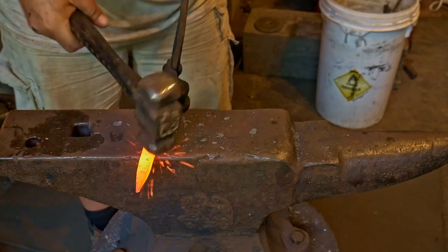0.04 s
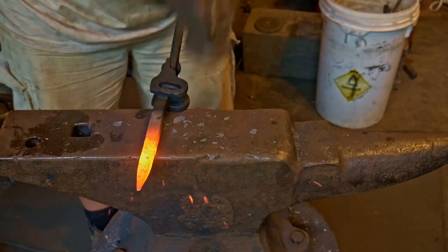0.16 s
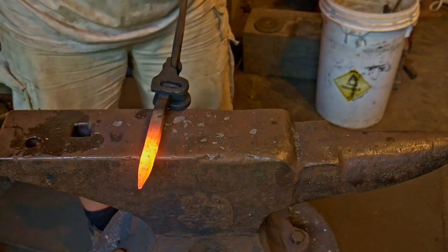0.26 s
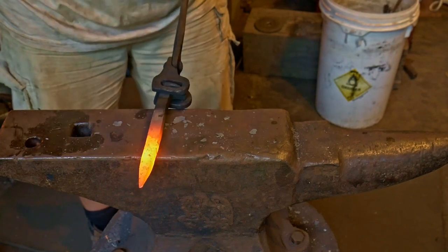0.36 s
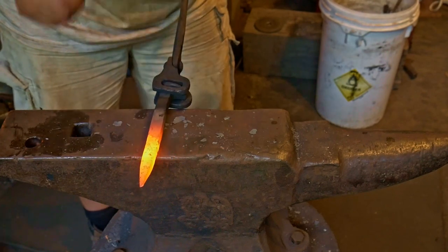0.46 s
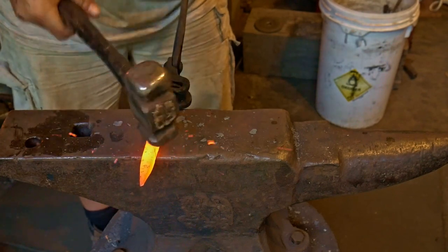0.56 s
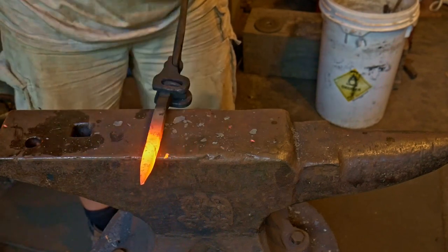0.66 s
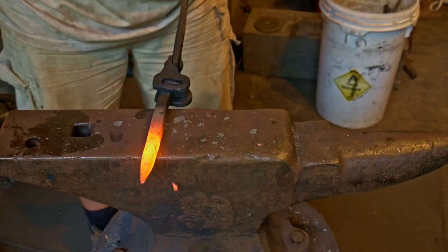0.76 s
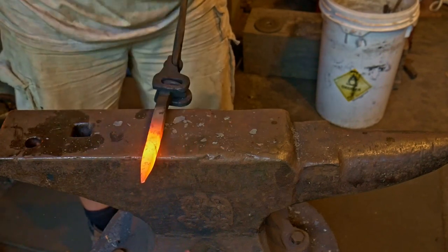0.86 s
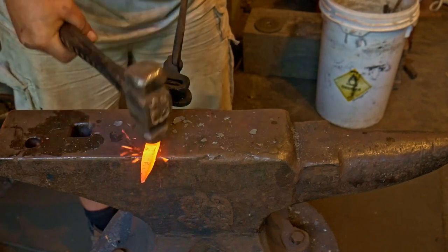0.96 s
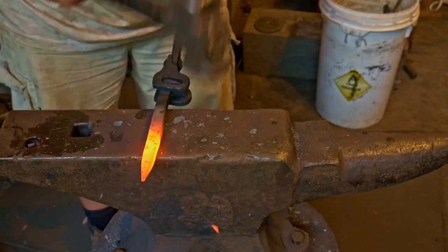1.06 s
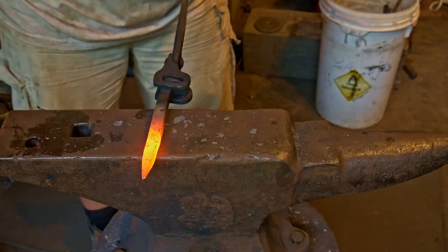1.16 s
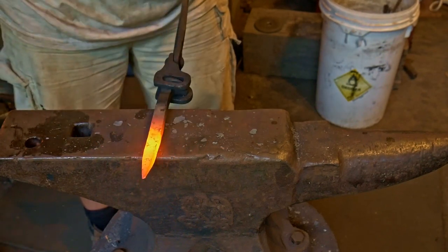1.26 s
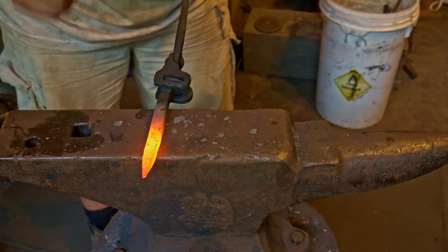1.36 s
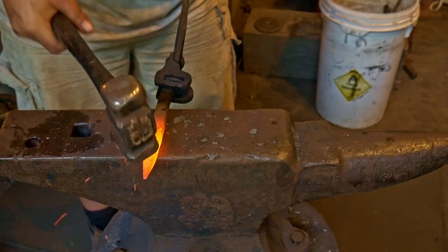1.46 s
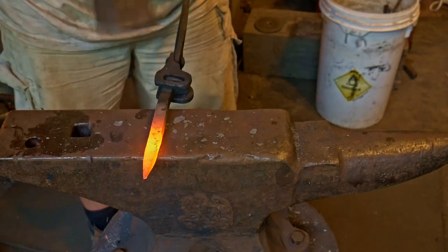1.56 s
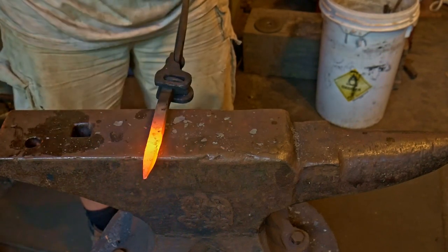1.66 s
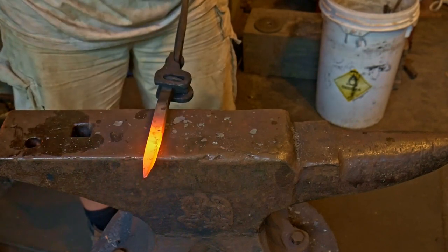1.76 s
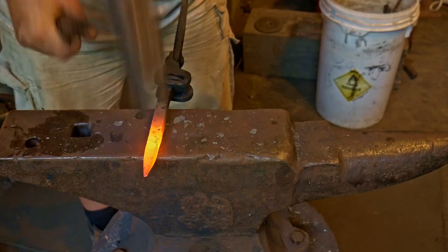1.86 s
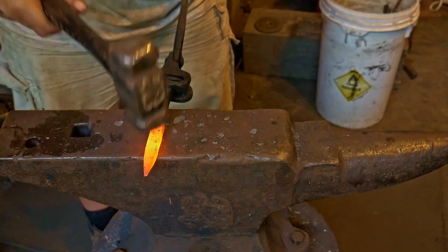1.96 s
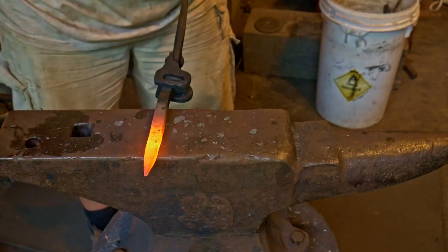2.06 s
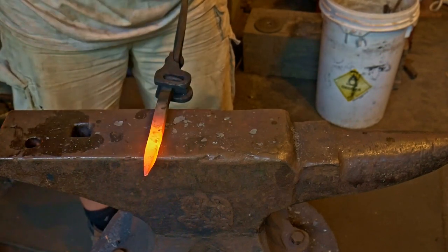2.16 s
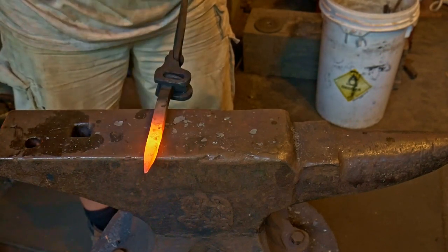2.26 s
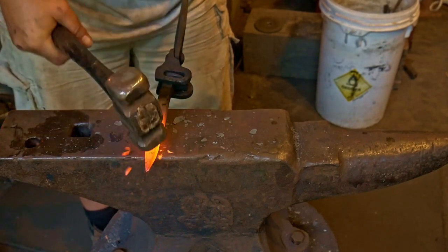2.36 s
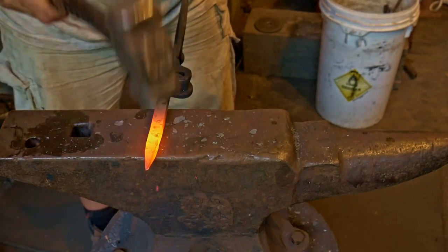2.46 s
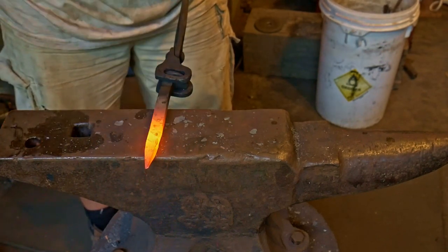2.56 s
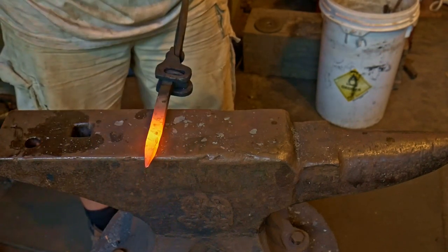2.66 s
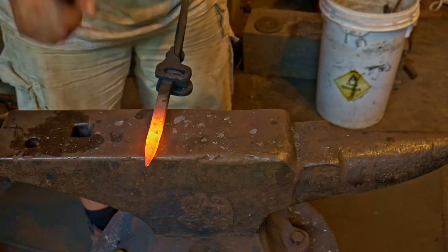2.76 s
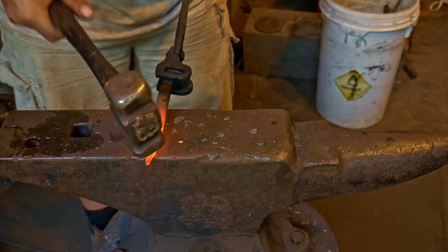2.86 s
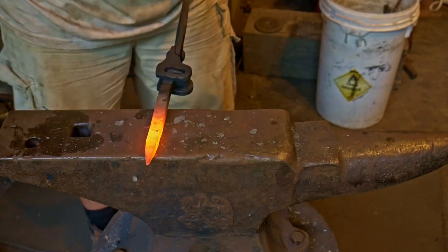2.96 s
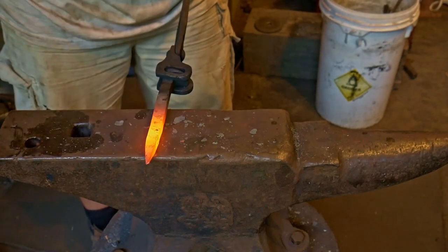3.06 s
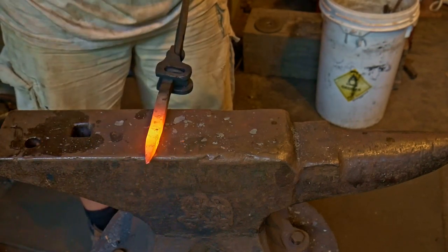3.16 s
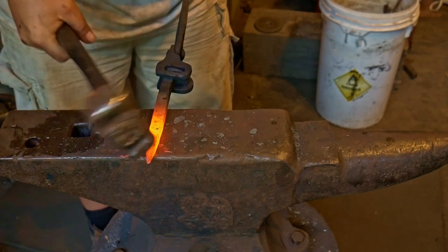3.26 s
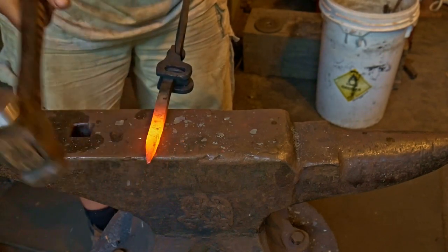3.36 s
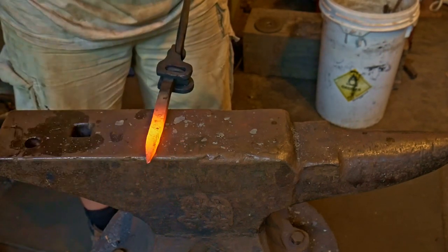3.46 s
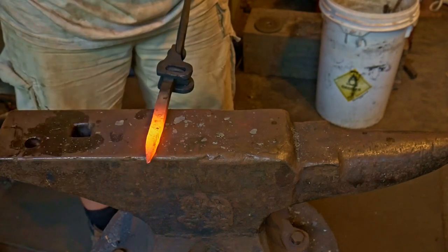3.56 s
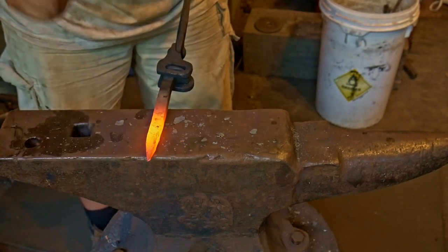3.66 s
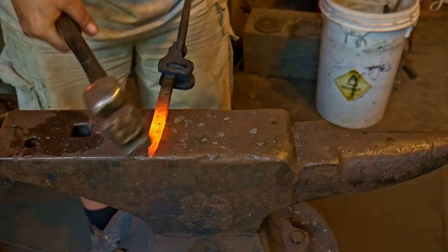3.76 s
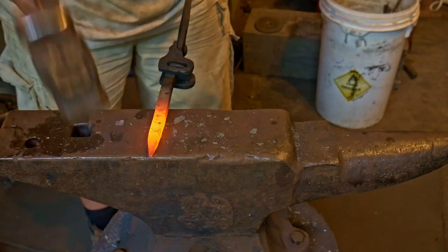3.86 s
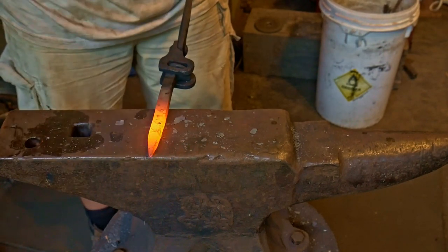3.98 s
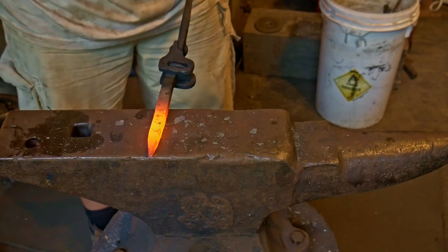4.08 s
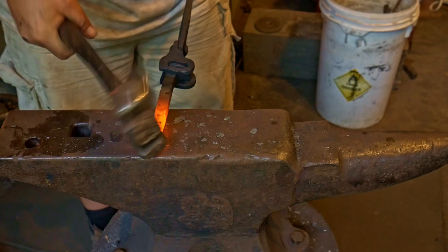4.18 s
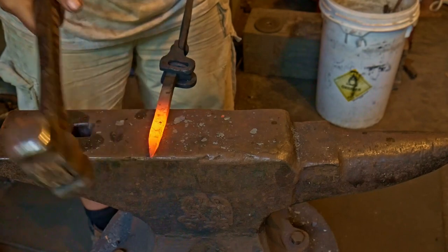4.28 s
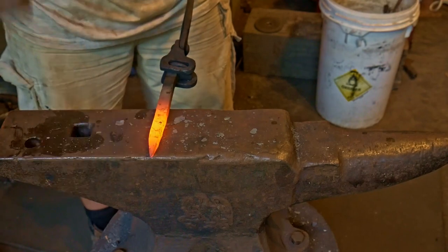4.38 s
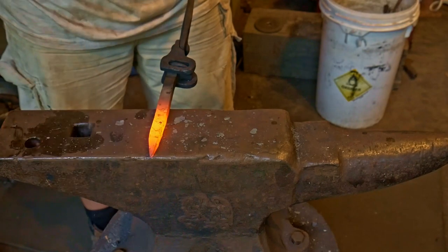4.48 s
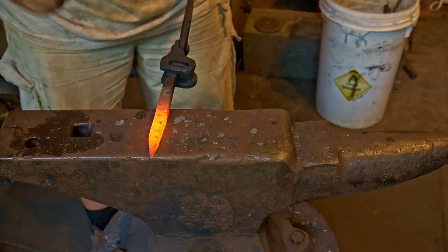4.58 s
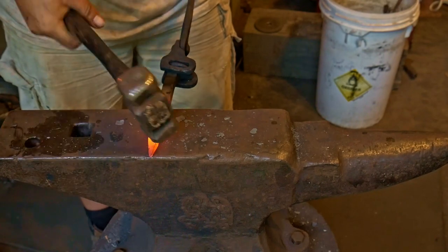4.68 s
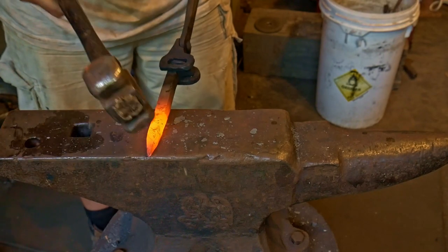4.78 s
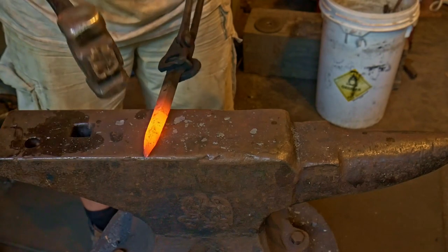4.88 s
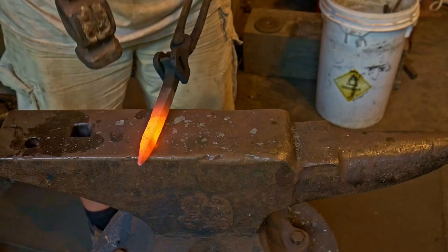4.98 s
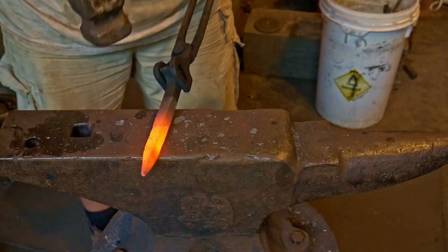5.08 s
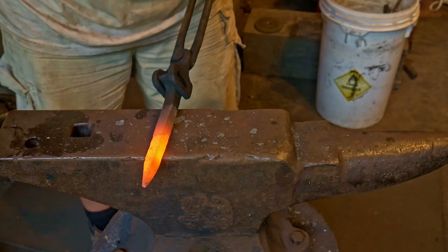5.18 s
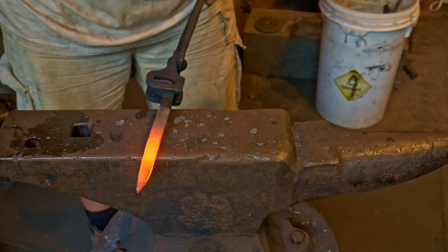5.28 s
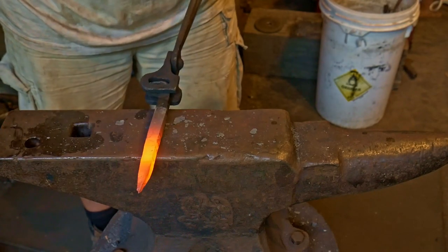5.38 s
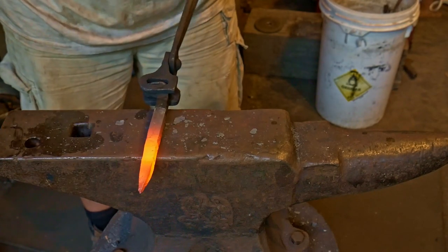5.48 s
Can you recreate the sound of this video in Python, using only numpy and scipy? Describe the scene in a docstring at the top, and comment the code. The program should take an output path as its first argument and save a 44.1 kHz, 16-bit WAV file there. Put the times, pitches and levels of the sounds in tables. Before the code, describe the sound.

Steady blacksmithing heard close up: eleven forceful blows, thick and damped rather than bell-like, with crisp cracks that gradually soften. Early hits thump the anvil; later ones, around four seconds, have more tong clink and jangle. Short bright reflections fill the small workshop. Low fire noise breathes back between overloaded, compressed strikes, then remains alone after the last blow, with one very soft handling bump.

```python
"""Hammer and anvil in a small forge

A smith draws out a red-hot spike: eleven even blows, with soft bumps as the work is shifted.
Each blow layers damped-mode knocks, a noise crack that loses level blow by blow, and short modal rings.
Lying flat, the spike passes the blow to the anvil as a thump; tilted, it jolts the tongs instead.
Filtered noise makes the forge's rush and the workshop's echoes.
A limiter ducks at every blow and lets the room and forge swell back."""
import sys
import numpy as np
from scipy import signal
from scipy.fft import rfft, irfft, next_fast_len
from scipy.io import wavfile
from scipy.ndimage import uniform_filter1d, minimum_filter1d

SR = 44100
rng = np.random.default_rng(int(sys.argv[2]) if len(sys.argv) > 2 else 0)


def bounce(signal):
    """Save signal as a 16-bit WAV file at the path given by the first command-line argument."""
    frames = np.transpose(np.atleast_2d(signal))
    limited = np.clip(frames, -1, 1)
    pcm = np.round(limited * 32767).astype(np.int16)
    wavfile.write(sys.argv[1], SR, pcm)


N = 243873

# Table levels are relative within their layer; the functions set the final mix.
# Forge rush, tone colour: [f/Hz, level/dB per Hz]
FORGE_COLOUR = [(25, -44.5), (60, -21), (120, -3), (260, -8), (350, -2.5), (430, -1), (520, -6.5),
                (950, -7.5), (1500, -14), (4000, -23.5), (8300, -32), (11000, -37), (14000, -57),
                (16000, -70.5)]
# Forge rush, level over time before trim and flutter: [t/s, level/dB]
FORGE_LEVEL = [(0.0, -47), (0.31, -51.5), (1.32, -49.5), (5.18, -53.5), (5.5, -51)]
# Forge rush, stereo width: [f/Hz, side minus mid level/dB]
FORGE_WIDTH = [(60, -2), (200, -14), (700, -8.5), (4400, -10.5), (15000, -3)]
# Soft bumps as the work is shifted: [t/s, level/dB, centre f/Hz, t60/s]
TOUCHES = [(.905, -44, 403, 0.17), (5.335, -45.5, 385, 0.26)]
# Workshop's echo of the knock: [f/Hz, level/dB, t60/s]
ROOM_ECHO = [(99.2, -2, 0.13), (156.9, -3, 0.45), (301, -11, 0.2), (550, -11.5, 0.17), (750, -16.5, .28),
             (1150, -8.5, 0.24), (1542, -18, 0.23), (2710, -11.5, 0.37), (4560, -16.5, 0.26),
             (9000, -16, .27)]
# Diffuse wash after each crack and high ring: [f/Hz, level/dB, t60/s]
WASH_ECHO = [(397, -37, .3), (1177, -12, 0.37), (2600, -1, 0.16), (3326, 2, 0.36), (4400, 3, 0.28),
             (6490, 0.5, .3), (7960, -1, 0.3), (9690, -0.5, 0.091), (11600, -7, .24), (14210, -11.5, .2),
             (16000, -27, 0.19)]
# Anvil rocking on its stand: [f/Hz, level/dB, t60/s]
THUMP_MODES = [(202, -26.5, 0.033), (272.2, -11, 0.035), (335, -13.5, 0.053)]
# Hammer, hot steel and anvil pressed together, heavily damped: [f/Hz, level/dB, t60/s]
KNOCK_MODES = [(738, -7.5, 0.015), (892, -7.5, 0.014), (1362, 1, 0.0069), (1825, 4, 0.0046),
               (2353, -7, 0.015)]
# Spike jumping in the jaws of the tongs: [f/Hz, level/dB, t60/s]
CLINK_MODES = [(2716, -10, 0.019), (3183, -15, 0.0084)]
# Free ring of the anvil: [f/Hz, level/dB, t60/s]
ANVIL_MODES = [(264, -41.5, .25), (303.9, -33.5, 0.25), (365, -39.5, 0.27), (415, -39, 0.23),
               (904, -48, 0.34), (1101, -43, 0.25), (1135.4, -41, 0.26), (1170, -41.5, 0.25),
               (1282, -39, 0.16), (1299, -31, 0.24), (1279, -37.5, 0.21), (1800, -51, 0.14),
               (1840, -49.5, 0.19), (3550, -45, 0.22), (4870, -53.5, .2), (10975, -52, .23)]
# Free ring of the anvil's face: [f/Hz, level/dB, t60/s]
FACE_MODES = [(2190, -51, 0.17), (2364, -36.5, 0.16), (3736, -42.5, 0.16), (3822, -39.5, 0.17),
              (3855, -42.5, 0.1)]
# Free ring of the tongs: [f/Hz, level/dB, t60/s]
TONGS_MODES = [(2680, -50.5, 0.38), (2770, -47, 0.35), (2780, -50.5, 0.35), (2790, -46, 0.2),
               (2850, -48.5, 0.24), (2828, -49, 0.2), (2990, -53, 0.36)]
# Free ring of the spike: [f/Hz, level/dB, t60/s]
SPIKE_MODES = [(4390, -54.5, 0.31), (4610, -56, 0.32), (4570, -46, .25), (4650, -53.5, 0.29),
               (4670, -53.5, 0.29)]
# Hammer head's high ring: [f/Hz, level/dB, t60/s]
HEAD_MODES = [(6220, -58, 0.19), (6605, -50, 0.2), (6800, -53, 0.27), (8600, -54.5, 0.17), (9300, -49, .15),
              (10020, -52.5, .14)]
# Contact crack, tone colour: [f/Hz, level/dB]
CRACK_COLOUR = [(1500, -21.5), (2800, -0.5), (4000, 2), (6500, -3.5), (7800, -6), (9500, -2), (11500, -9),
                (14500, -14.5), (16500, -33)]
# Hammer blows: [t/s, spike tilt (0 flat to 1 on its tip), anvil face ring level/dB, spike ring level/dB]
BLOWS = [(0.1115, 0.32, -3, 1), (0.5783, 0.39, -8.5, 0.5), (1.0302, .25, -3.5, -0.5),
         (1.4917, 0.45, .5, -11.5), (1.9541, 0.42, 6.5, 1), (2.4192, 0.043, 3.5, -8),
         (2.8764, 0.21, 2.5, -6), (3.334, 0.55, -4, -3.5), (3.8126, 1, 6.5, 2.5), (4.2599, 0.91, 0, 2.5),
         (4.7398, .75, -.5, -4)]

FORGE_TRIM_DB = -0.3
FLAT_THUMP_DB, TILT_THUMP_LOSS_DB = -0.03, 5.5  # thump with the spike flat; what full tilt takes away
TONGS_DB = 5  # tongs at full tilt
FIRST_CRACK_DB, CRACK_LOSS_DB_PER_BLOW = 3.5, 0.64
CEILING_DB, RELEASE_DB_PER_S, HOLD_S = 0.25, 118, 0.026  # limiter; ceiling relative to full scale
TOP_HZ = 16300
AGE = np.arange(int(.6 * SR)) / SR  # seconds since a sound began


def undb(db):
    """Decibels to gain."""
    return 10 ** (np.asarray(db) / 20)


def unit(x):
    """Scale to rms 1."""
    return x / np.sqrt(np.mean(x ** 2))


def along(hz, points):
    """Read [f/Hz, value] points along a log-frequency axis."""
    f, value = np.transpose(points)
    return np.interp(np.log(hz + 1), np.log(f), value)


def colour(x, points):
    """Equalize a sound by a [f/Hz, level/dB] curve."""
    size = next_fast_len(len(x))
    gain = undb(along(np.fft.rfftfreq(size, 1 / SR), points))
    return irfft(rfft(x, size) * gain, size)[:len(x)]


def fade(t60):
    """Exponential decay, falling 60 dB in t60 seconds."""
    return np.exp(-np.log(1000) * AGE / t60)


def add(track, s, sound):
    """Mix a sound into a track at s seconds."""
    i = int(s * SR)
    track[i:i + len(sound)] += sound[:len(track) - i]


def stereo(mid, side):
    """Left and right from mid and side."""
    return np.array([mid + side, mid - side])


def walk(rate):
    """Slow random drift: smoothed random steps, rate of them per second."""
    k = int(SR / rate)
    steps = np.repeat(rng.standard_normal(N // k + 1), k)
    return 0.53 * uniform_filter1d(uniform_filter1d(steps, k), k)[:N]


def forge():
    """A rush of fire from filtered noise, with a hollow chamber note and a slight flutter in level."""
    mid, side = (unit(colour(rng.standard_normal(N), FORGE_COLOUR)) for _ in range(2))
    chamber_colour = [(250, -49), (380, -11.0), (425, 2.5), (470, -6), (700, -44.5)]
    chamber = unit(colour(rng.standard_normal(N), chamber_colour))
    level_db = np.interp(np.arange(N) / SR, *np.transpose(FORGE_LEVEL)) + 0.28 * walk(2.8)
    rush = stereo(mid + undb(-9.5) * chamber, colour(side, FORGE_WIDTH))
    return rush * undb(level_db + FORGE_TRIM_DB)


def handling():
    """Faint bumps as the work is shifted: soft-edged bursts of noise around one pitch."""
    out = np.zeros(N)
    for s, db, hz, t60 in TOUCHES:
        noise = colour(rng.standard_normal(len(AGE)), [(hz / 10, -60), (hz, 0), (hz * 10, -70)])
        soft_attack = np.minimum(AGE / 0.0087, 1)
        add(out, s, undb(db) * unit(noise) * fade(t60) * soft_attack)
    return out


def echo(bands, early_db, early_t60):
    """A noise-built room response: dense reflections from things nearby blended with the walls' tail."""
    decays = [(hz, t60) for hz, db, t60 in bands]
    noise = rfft(colour(rng.standard_normal(len(AGE)), [(hz, db) for hz, db, t60 in bands]))
    octave = np.log2(np.clip(np.fft.rfftfreq(len(AGE), 1 / SR), 125, 16000) / 125)
    early = undb(early_db) * fade(early_t60)
    tail = 0
    for k in range(8):  # overlapping octave bands, each with its own decay
        band = irfft(noise * np.maximum(1 - abs(octave - k), 0), len(AGE))
        late = fade(along(125 * 2 ** k, decays))
        tail = tail + band * (late + early) / np.sqrt(np.sum(late ** 2))
    return tail * np.clip(AGE / 0.01, 0, 1) ** 2  # reflections build over 10 ms


def workshop(x, side_db):
    """The room answers every knock alike, through separate mid and side responses."""
    mid, side = (signal.fftconvolve(x, echo(ROOM_ECHO, early_db=-3.5, early_t60=0.16))[:N]
                 for _ in range(2))
    return stereo(mid, undb(side_db) * colour(side, [(300, -7.5), (1200, -1), (5000, -5.0)]))


def wash(crack_db, ringing):
    """Short waves scatter anew each blow, so every crack and high ring has its own shimmering tail."""
    click = undb(crack_db - 1.0) * signal.unit_impulse(len(AGE))
    response = echo(WASH_ECHO, early_db=-1.5, early_t60=0.064)
    return signal.fftconvolve(click + undb(-5.0) * ringing, response)


def ring(modes, scatter_db, detune):
    """Struck modes as decaying sines of alternating polarity, with random level and pitch each blow."""
    out = np.zeros(len(AGE))
    for k, (hz, db, t60) in enumerate(modes):
        level_chance, pitch_chance = rng.standard_normal(2)
        gain = (-1) ** k * undb(db + scatter_db * level_chance)
        tone = np.sin(2 * np.pi * hz * (1 + detune * pitch_chance) * AGE)
        out += gain * fade(t60) * tone
    return out


def crack(t60, crumble_db, crumble_t60):
    """Steel meets steel with a sharp noise snap; crumbling oxide scale leaves a quieter, longer decay."""
    noise = unit(colour(rng.standard_normal(len(AGE)), CRACK_COLOUR))
    return noise * (fade(t60) + undb(crumble_db) * fade(crumble_t60))


def blow_levels(count, tilt):
    """Relative dB of thump, crack and tongs: tilt moves force to the tongs, lost scale softens the crack."""
    thump_db = FLAT_THUMP_DB - TILT_THUMP_LOSS_DB * tilt
    crack_db = FIRST_CRACK_DB - CRACK_LOSS_DB_PER_BLOW * count  # count = earlier blows
    tongs_db = TONGS_DB + 20 * np.log10(max(tilt, .01))  # jolt proportional to tilt
    return thump_db, crack_db, tongs_db


def hammer():
    """Blows excite damped knocks and free rings; returns body, bright part and its tail as mid and side."""
    body, bright, tail_mid, tail_side = np.zeros((4, N))
    squeeze = 1 - np.exp(-AGE / 0.00081)  # hot steel yields, so the force builds gradually
    for count, (s, tilt, face_db, spike_db) in enumerate(BLOWS):
        thump_db, crack_db, tongs_db = blow_levels(count, tilt)
        thump = undb(thump_db) * ring(THUMP_MODES, scatter_db=1.13, detune=0.0095)
        press = ring(KNOCK_MODES, scatter_db=0.34, detune=0.014)
        clink = undb(tongs_db) * ring(CLINK_MODES, scatter_db=2.5, detune=0.015)
        knock = thump + press - clink
        anvil = ring(ANVIL_MODES, scatter_db=0.3, detune=0.00095)

        face = undb(face_db) * ring(FACE_MODES, scatter_db=2.0, detune=0.00066)
        tongs = undb(tongs_db) * ring(TONGS_MODES, scatter_db=2.0, detune=0.0058)
        spike = undb(spike_db) * ring(SPIKE_MODES, scatter_db=3, detune=.008)
        head = undb(crack_db) * ring(HEAD_MODES, scatter_db=2, detune=0.0044)
        ringing = face + tongs + spike + head
        snap = undb(crack_db - 8.0) * crack(t60=0.011, crumble_db=-33.5, crumble_t60=0.17)

        add(body, s, squeeze * knock + anvil)
        add(bright, s, squeeze * snap + ringing)
        for track in (tail_mid, tail_side):
            add(track, s, wash(crack_db, ringing))
    return body, bright, tail_mid, tail_side


def scene():
    """The anvil stands close and slightly left, with the room and the forge around it."""
    background = handling() + forge()
    body, bright, tail_mid, tail_side = hammer()
    direct = stereo(body + bright, undb(-18.5) * (body + bright))
    room = workshop(body, side_db=-6.5) + stereo(tail_mid, undb(-7.5) * tail_side)
    return undb(14.0) * (direct + room) + background


def limiter(x):
    """Gain drops just ahead of each crest, holds briefly and climbs back at a steady dB rate."""
    t = np.arange(N) / SR
    power = uniform_filter1d(np.mean(x ** 2, axis=0), size=44)  # 1 ms average
    crest = np.sqrt(2 * abs(power) + 1e-12)
    over_db = np.maximum(20 * np.log10(crest) - CEILING_DB, 0)
    duck_db = np.maximum.accumulate(over_db + RELEASE_DB_PER_S * t) - RELEASE_DB_PER_S * t
    half = int(HOLD_S * SR / 2)
    held_db = minimum_filter1d(-duck_db, size=2 * half + 1, origin=half)  # window reaches back in time
    ahead_db = minimum_filter1d(held_db, size=161)
    return x * undb(uniform_filter1d(ahead_db, size=81))


def record(dry):
    """Limit every blow, clip any remaining crests, then cut deep bass and extreme top."""
    limited = np.clip(limiter(dry), -1, 1)
    low_cut = signal.butter(2, 78, "highpass", fs=SR, output="sos")
    top_cut = signal.ellip(8, .2, 70, TOP_HZ, fs=SR, output="sos")
    return signal.sosfilt(top_cut, signal.sosfilt(low_cut, limited))


dry = scene()
out = record(dry)
bounce(out)
```